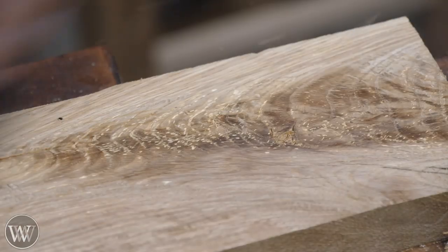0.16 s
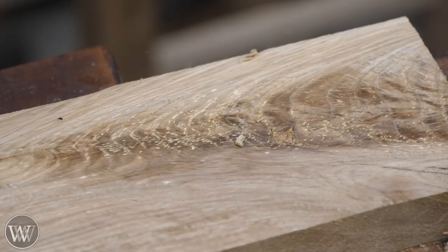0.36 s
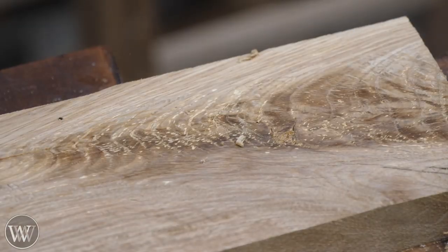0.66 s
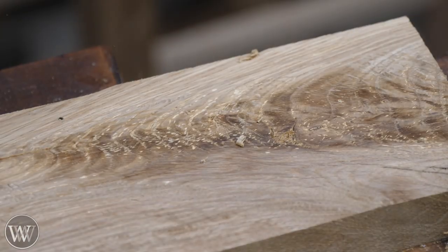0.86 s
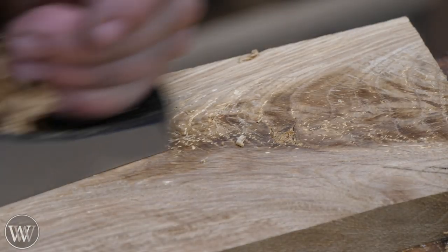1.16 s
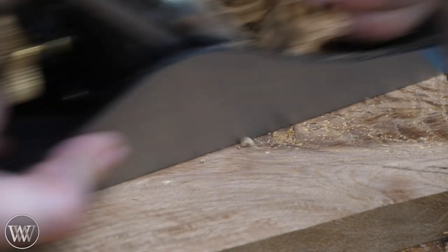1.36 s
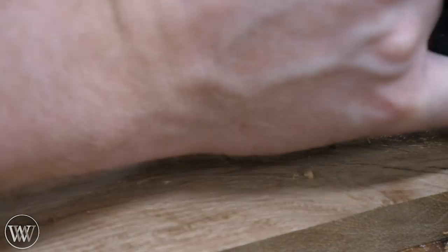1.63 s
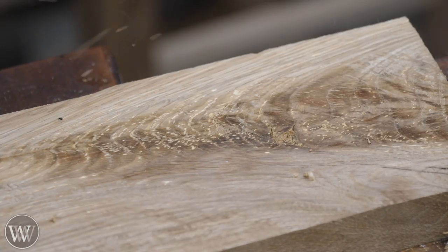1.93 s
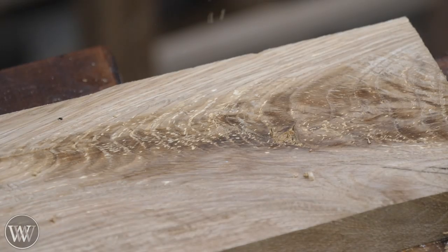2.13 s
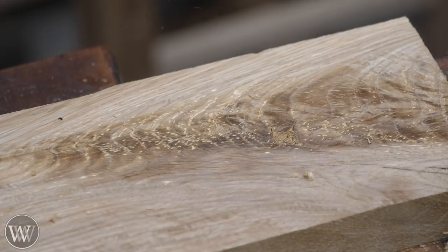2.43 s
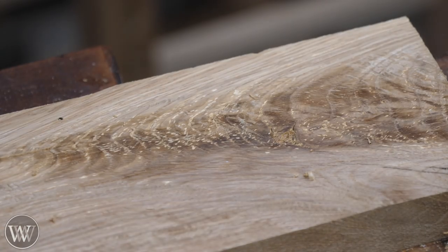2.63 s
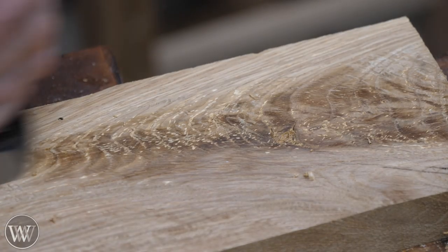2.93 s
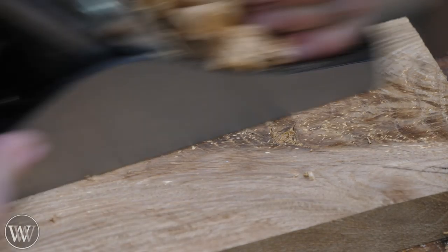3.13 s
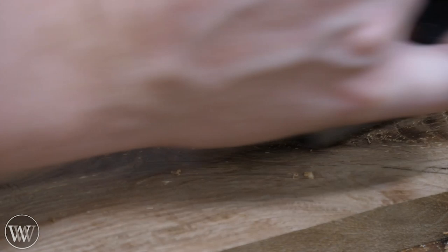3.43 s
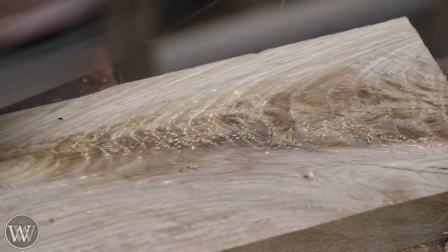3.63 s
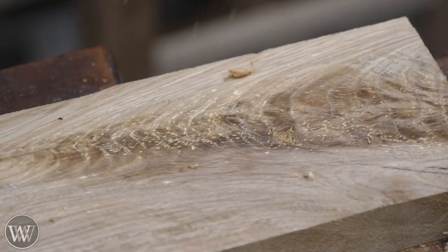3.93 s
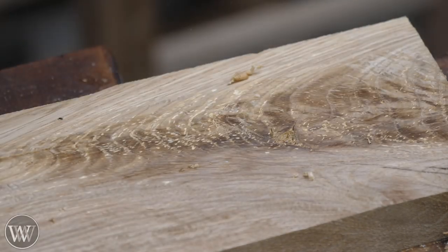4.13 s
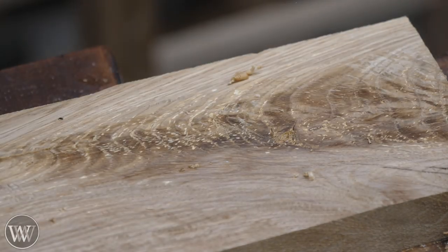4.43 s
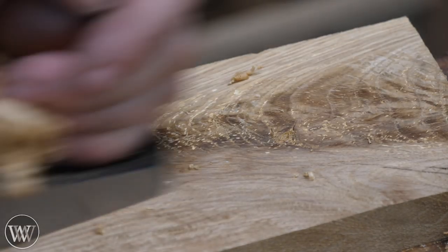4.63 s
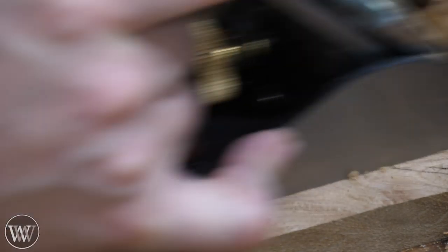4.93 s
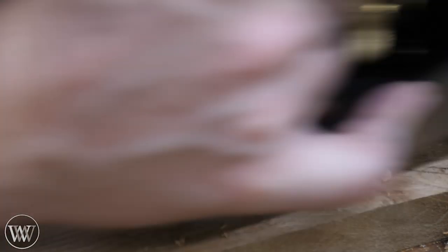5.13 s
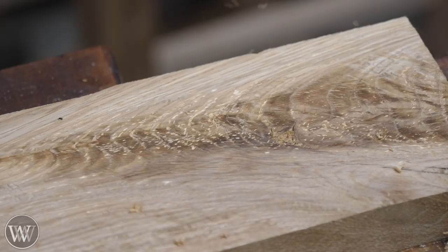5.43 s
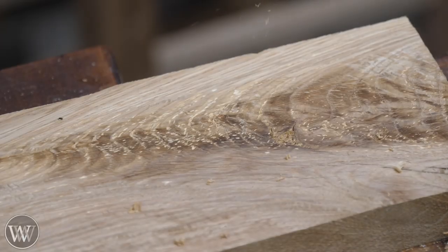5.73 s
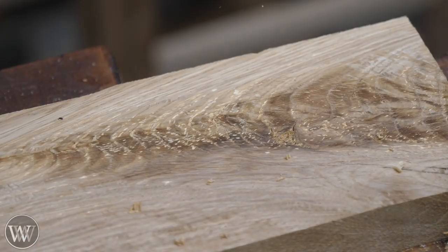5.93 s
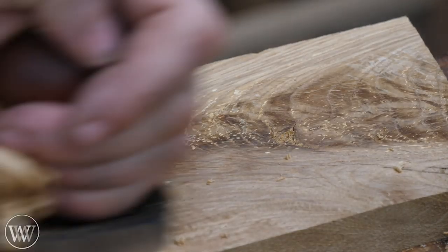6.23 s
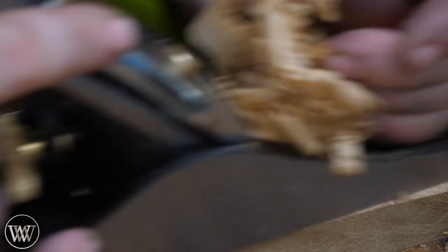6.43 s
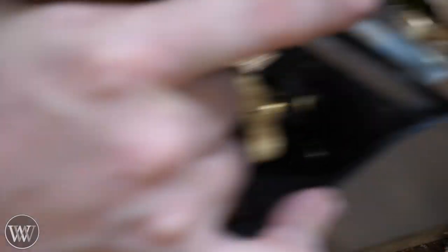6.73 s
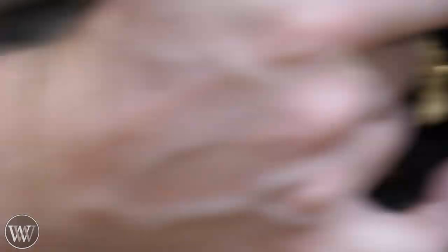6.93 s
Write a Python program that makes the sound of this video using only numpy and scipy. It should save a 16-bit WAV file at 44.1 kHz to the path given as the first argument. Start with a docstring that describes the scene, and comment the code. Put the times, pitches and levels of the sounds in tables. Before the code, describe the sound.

Four rasping plane strokes on hard wood, each opened by a loud wooden knock and separated by rumbling thumps, very close in a quiet workshop.

```python
"""In a small workshop, a hand plane takes four strokes along an oak board. The iron sole lands before each stroke
with a knock, a sum of decaying sines and noise; lighter knocks mark the last stroke. The blade tears fibres: dense
random snaps make a hiss that drives resonances of plane and board. Ahead of each landing, as the plane is carried,
low bumps and a rumble reach the single close microphone, which turns its gain down after loud peaks and clips."""
import sys
import numpy as np
from scipy import signal
from scipy.fft import rfft, irfft, next_fast_len
from scipy.io import wavfile
from scipy.ndimage import uniform_filter1d, map_coordinates

SR = 44100
rng = np.random.default_rng(int(sys.argv[2]) if len(sys.argv) > 2 else 0)


def store_pcm(level_fs):
    """Save levels as 16-bit WAV."""
    pcm = np.round(np.clip(level_fs, -1, 1) * 32767).astype(np.int16)
    wavfile.write(sys.argv[1], SR, np.atleast_2d(pcm).T)


N = 312228
STEP = 32  # samples between points of slow controls


def amp(db):
    """Decibels to an amplitude ratio."""
    return 10 ** (np.asarray(db) / 20)


def unit(x):
    """Normalisation to an rms of 1."""
    return x / np.sqrt(np.mean(x ** 2) + 1e-20)


def along(points, hz):
    """Interpolation of (Hz, value) points on a logarithmic frequency axis."""
    f, v = np.transpose(points)
    return np.interp(np.log(hz + 1), np.log(f + 1), v)


def curves(rows):
    """Linear interpolation in time: one value per sample for each column after the time."""
    s, *cols = np.transpose(rows)
    return [np.interp(np.arange(N) / SR, s, c) for c in cols]


def wobble(rate):
    """Slow random modulation: a smooth curve through rate random knots a second."""
    k = np.arange(0, N + STEP, STEP)
    knots = rng.standard_normal(int(N * rate / SR) + 4)
    return np.interp(np.arange(N), k, map_coordinates(knots, [k * rate / SR]))


def peaks(events, rise_db_per_s, fall_db_per_s):
    """Exponential growth and decay: summed gain of swells that climb to (s, dB) and sink again."""
    t = np.arange(0, N + STEP, STEP) / SR
    gain = 0
    for s, db, *_ in events:
        loss_db = np.where(t < s, rise_db_per_s * (s - t), fall_db_per_s * (t - s))
        gain = gain + amp(db - loss_db)
    return np.interp(np.arange(N) / SR, t, gain)


def filtered(x, response):
    """Linear filtering: the spectrum of x times a response of frequency."""
    m = next_fast_len(N + SR // 2)
    return irfft(rfft(x, m) * response(np.fft.rfftfreq(m, 1 / SR)), m)[..., :N]


def shaped(x, spectrum):
    """Spectral shaping of x by (Hz, dB) points."""
    return filtered(x, lambda f: amp(along(spectrum, f)))


def band(x, lo_hz, hi_hz):
    """Causal band-pass filtering."""
    sos = signal.butter(2, [lo_hz, min(hi_hz, .45 * SR)], "bandpass", fs=SR, output="sos")
    return signal.sosfilt(sos, x)


def resonance(f, centre_hz, width_hz, db):
    """Response of a damped resonator, with its peak at the centre frequency."""
    damping = 1j * f * width_hz
    return amp(db) * damping / (centre_hz * centre_hz - f * f + damping)


def swelling(x, table, depth_db, rate):
    """Modal excitation: each mode swells and fades on its own as the pressure on the iron shifts."""
    each = filtered(x, lambda f: np.array([resonance(f, *mode) for mode in table]))
    return sum(amp(depth_db * wobble(rate)) * y for y in each)


def snaps(spread_db, patchy_db):
    """Granular noise: dense snaps of unequal size, in patches of gain that drift in time and pitch."""
    grains = rng.standard_normal(N + 512) * amp(spread_db * rng.standard_normal(N + 512))
    z = signal.stft(grains, nperseg=512)[2]
    field = uniform_filter1d(rng.standard_normal(z.shape), 8, 0)
    field = uniform_filter1d(field, 10, 1)
    return signal.istft(z * amp(patchy_db * unit(field)), nperseg=512)[1][:N]


def noise(spectrum):
    """Random noise of rms 1 with a shaped spectrum."""
    return unit(shaped(rng.standard_normal(N), spectrum))


# spectrum of the room and microphone noise: pitch_hz, level_db (per Hz)
AIR_SPECTRUM = [(88, -2), (150, 4), (475, 4), (662, 0), (1760, -7.5), (3160, -14.5), (9630, -17),
                (14200, -14), (16000, -25)]
AIR_DB = -51.5


def room_air():
    """Background noise: shaped granular noise whose level drifts slowly."""
    return amp(AIR_DB + 3.6 * wobble(4.2)) * unit(shaped(snaps(spread_db=1.6, patchy_db=2.0), AIR_SPECTRUM))


# strokes, one row each: lift_off_s, slide_hiss_db (change while sliding), groan_db (over the ring)
STROKES = [(1.74, -13.5, -28), (3.479, -4.5, -17), (5.182, -11.5, -15), (6.96, -4.5, -13.5)]
# the blade in the wood, one list a stroke, from landing to the far edge: time_s, hiss_db, ring_db, scrape_db
CUTS = [
    [(0.6, -82, -64, -64), (0.66, -52, -52, -45), (0.745, -40, -41.5, -37), (0.925, -33, -35.5, -39.5),
     (0.98, -36, -42.5, -41), (1.05, -30.5, -40.5, -41), (1.11, -25, -30.5, -42), (1.21, -31, -33, -56),
     (1.32, -28.5, -34.5, -43), (1.4, -28.5, -35.5, -40), (1.49, -28, -35.5, -49), (1.56, -27, -35, -52)],
    [(2.38, -53, -48, -46), (2.44, -41.5, -59, -32), (2.505, -44, -33, -36.5), (2.525, -40, -29, -27),
     (2.556, -50, -37, -36), (2.625, -42, -55, -41), (2.643, -33, -34, -32), (2.81, -36, -33, -38.5),
     (2.93, -27, -38.5, -36.5), (3.01, -23.5, -35, -36), (3.1, -27.5, -27, -56), (3.16, -26, -34.5, -41),
     (3.335, -26, -32.5, -55)],
    [(4.12, -53, -52, -41), (4.19, -38.5, -49, -32.5), (4.228, -45, -38, -30), (4.256, -35, -38, -41.5),
     (4.29, -33.5, -36, -32), (4.335, -29.5, -28.5, -33.5), (4.428, -35, -34, -36.5),
     (4.46, -30, -39, -27.5), (4.575, -24.5, -30, -40.5), (4.72, -27.5, -36, -36.5), (4.8, -27, -32, -44),
     (4.88, -24.5, -28, -46), (4.93, -27, -30, -39), (5.015, -24, -32.5, -44)],
    [(5.75, -59, -48, -42), (5.82, -42, -35, -31), (5.87, -31, -28, -30), (5.93, -34.5, -25.5, -39.5),
     (6.07, -33, -38.5, -34.5), (6.12, -28.5, -32.5, -28.5), (6.142, -26.5, -25, -25.5),
     (6.17, -27, -31.5, -35), (6.27, -27, -38, -36), (6.325, -27.5, -28.5, -31), (6.43, -24, -33.5, -37.5),
     (6.57, -24.5, -28, -38), (6.63, -27, -33, -53), (6.81, -26.5, -32.5, -48)],
]
# leaving the wood; tipping the sole at lift-off; dying away
EXIT_S, LIFT_S, GONE_S = 0.01, 0.035, 0.26
# hiss: drop at the edge; further change by lift-off and just after it, each from the sliding level
EXIT_DROP_DB, LIFT_HISS_DB, GONE_HISS_DB = -7, -12, -21
# ring, from its last level in the cut: past the edge, before lift-off, tipping (it rings up), just after
EXIT_RING_DB, SLIDE_RING_DB, LIFT_RING_DB, GONE_RING_DB = -7, -15, -8.5, -26.5
SLIDE_SCRAPE_DB = -8  # scrape relative to the ring from the edge until it dies away


def travel():
    """Contact control: hiss, ring and scrape dB, share of cut done, groan offset dB; in the air, silent."""
    rows = []
    for cut, (lift, slide_db, groan_over) in zip(CUTS, STROKES):
        start, (end, hiss, ring, _) = cut[0][0], cut[-1]
        bare = hiss + EXIT_DROP_DB
        sliding = bare + slide_db
        gone = lift + LIFT_S + GONE_S
        rows += [(start - LIFT_S, -90, -90, -90, 0, groan_over)]
        rows += [(*row, (row[0] - start) / (end - start), groan_over) for row in cut]
        # past the edge the sole slides on bare
        after = [(end + EXIT_S, bare, ring + EXIT_RING_DB),
                 (lift - LIFT_S, sliding, ring + SLIDE_RING_DB),
                 (lift, sliding + LIFT_HISS_DB, ring + LIFT_RING_DB),
                 (lift + LIFT_S, sliding + GONE_HISS_DB, ring + GONE_RING_DB),
                 (gone, -90, ring - 40),
                 (gone + LIFT_S, -90, -90)]
        rows += [(s, h, r, r + SLIDE_SCRAPE_DB, 1, groan_over) for s, h, r in after]
    return curves(rows)


# the bench shudders: peak_s, level_db (of the rumble gain)
SHUDDERS = [(0, -43), (.22, -22), (.5, -51), (1.12, -41), (1.6, -34), (1.96, -34), (2.01, -27), (2.32, -52),
            (2.93, -39), (3.39, -30), (3.47, -42), (3.74, -20), (4.07, -27), (5.05, -38), (5.39, -17),
            (5.72, -29.5), (6.58, -42), (6.78, -43), (6.96, -39)]
RISE_DB_PER_S, FALL_DB_PER_S = 236, 173
# rumble spectrum: pitch_hz, level_db (per Hz)
RUMBLE_SPECTRUM = [(13, -7.5), (22, 4.5), (81, 1.5), (250, -21.5), (416, -30), (500, -24.5), (650, -50),
                   (1100, -120)]
REST_DB, PUSHED_DB = -66.5, -20.5  # rumble at rest; rumble relative to the hiss level
# spectrum of rustling cloth and shavings: pitch_hz, level_db (per Hz)
RUSTLE_SPECTRUM = [(200, -20), (600, 2), (2000, -6), (5000, -7.5), (11000, -11), (16000, -21)]
RUSTLE_DB, RUSTLE_GROWTH = -41, 0.58  # exponent: it swings less than the rumble


def shudders():
    """Structure-borne vibration: a lumpy low rumble, and a rustle that follows the shudders by a power law."""
    shudder = peaks(SHUDDERS, RISE_DB_PER_S, FALL_DB_PER_S)
    lumps_db = 6 * wobble(14)
    shake = amp(REST_DB) + amp(travel()[0] + PUSHED_DB + lumps_db) + shudder
    rumble = shake * amp(1.95 * wobble(25)) * noise(RUMBLE_SPECTRUM)
    rustle = unit(shaped(snaps(spread_db=2.5, patchy_db=2.5), RUSTLE_SPECTRUM))
    return rumble + shudder ** RUSTLE_GROWTH * amp(RUSTLE_DB + 4.7 * wobble(50)) * rustle


# pushes on the microphone: peak_s, level_db (before venting), width_ms (2/3 of the decay constant)
BUMPS = [(.1944, -11.5, 0.65), (0.2014, -7, 1.5), (0.2256, -3, 4.3), (0.267, -12, 3.4), (0.29, -9, 6),
         (1.9596, 4.5, 0.34), (2.0079, 1, 1.55), (3.703, -11, 1.4), (3.71, -6, 0.97), (3.7399, 0.5, 2.8),
         (3.771, -8.5, 2.4), (3.803, -12, 5), (5.3627, -6, 2.8), (5.3676, 0, 0.5), (5.3755, -7.5, 0.9),
         (5.4149, -6.5, 0.99), (5.441, -15.5, 0.9)]


def bumps():
    """Pressure transients: one-sided pointed pushes on the capsule, high-passed by its vent."""
    push, t = np.zeros(N), np.arange(-SR // 20, SR // 20) / SR
    for s, db, ms in BUMPS:
        point = np.exp(-np.abs(t * 1000 / (1.5 * ms)) ** 1.07)
        push[round(s * SR) - SR // 20:][:len(t)] += amp(db) * np.hanning(len(t)) * point
    return filtered(push, lambda f: f ** 4 / (f ** 4 + 45 ** 4))  # slow pressure escapes


# small ticks near the microphone: start_s, level_db, treble_db (gain of the treble band)
TICKS = [(0.195, -22, -10), (0.21, -29, 14), (0.227, -16, -10), (0.265, -31, -23), (1.735, -25, -12),
         (1.958, -16.5, -2), (2.004, -18.5, -25.5), (3.709, -14.5, -5), (3.737, -4.5, -7),
         (5.366, -12, -20), (5.378, -22, 6), (5.417, -8, -16)]


def ticks():
    """Impulsive noise: dry bursts that decay in milliseconds, in a middle and a treble band."""
    out, t = np.zeros(N), np.arange(-SR // 20, SR // 20) / SR
    for s, db, treble_db in TICKS:
        burst = amp(-60 * np.abs(t) / 0.0056) * (t >= .001) * rng.standard_normal(len(t))
        tick = 1.87 * band(burst, 270, 2820) + amp(treble_db) * band(burst, 1800, 8000)
        out[round(s * SR) - SR // 20:][:len(t)] += amp(db) * tick
    return out


# the sole lands and bounces: start_s, level_db, then relative to it
# iron_db, thud_db, thud_hz, low_tail_db, bright_tail_db
KNOCKS = [(0.5033, -3.5, 0.5, -30, 242, -24.5, -19.5), (0.507, -12, 5, -30, 256, -26, -32),
          (2.2912, -4.5, -14, -11, 226, -15, -19.5), (2.312, -17.5, 12, -16, 230, -7.5, -10.5),
          (3.9559, -5, -10, -18, 206, -12, -16), (4.052, -6, 7, -7, 205, -13.5, -13.5),
          (5.6554, -2, -4.5, -16, 266, -16.5, -17), (5.6952, -5.5, 1, -3.5, 196, -14.5, -18),
          (6.126, -41, -7.5, -23, 457, -12, -13), (6.812, -36, -27, 22, 340, 6, -15),
          (6.958, -26.5, -24, 11.5, 244, -11.5, -11)]
# struck wood modes: pitch_hz, level_db, t60_s
STRUCK_WOOD = [(467, -8, 0.013), (623, -5, 0.011), (602, 23, 0.0027), (840, 2.5, 0.0088),
               (1060, -2.5, 0.0082)]
# struck iron modes: pitch_hz, level_db, t60_s
STRUCK_IRON = [(1816, 3.5, 0.011), (1988, -3.5, 0.026), (2160, -44, 1), (2280, -1.5, 0.011),
               (2480, -27, 0.04), (2730, -13, 0.016), (3020, -10, 0.01), (3260, -15, 0.018),
               (4900, -43, 0.0049)]
# spectrum of the rattle after a knock: pitch_hz, level_db (per Hz)
RATTLE_SPECTRUM = [(29, -44), (50, -4), (264, 2), (462, 1), (778, 5.5), (1510, -11.5), (1990, -10.5),
                   (2750, -17), (3300, -24.5), (6000, -30), (7800, -53), (13200, -120)]


def decaying_sine(t, hz, db, t60):
    """Free vibration of one damped mode, which falls 60 dB in t60 seconds."""
    return amp(db - 60 * t / t60) * np.sin(2 * np.pi * hz * t)


def struck(table, t):
    """Modal superposition: damped modes excited at slightly new strengths by each blow."""
    return sum(decaying_sine(t, hz, db + rng.normal(0, 1.5), t60) for hz, db, t60 in table)


def knocks():
    """Impact excitation: each landing rings wood and iron, thuds the bench and leaves a rattling tail."""
    out, tail, t = np.zeros(N + SR), np.zeros((2, N + SR)), np.arange(SR // 2) / SR
    onset = 1 - np.exp(-(t / 0.00065) ** 2)  # the contact lasts a fraction of a millisecond
    for s, db, iron_db, thud_db, thud_hz, low_db, bright_db in KNOCKS:
        start = round(s * SR)
        burst = 0.31 * amp(-60 * t / 0.0098) * rng.standard_normal(len(t))
        crack = band(band(burst, 1070, 6900), 600, 9500)
        iron = amp(iron_db) * (struck(STRUCK_IRON, t) + crack)
        thud = decaying_sine(t, thud_hz, thud_db, 0.043)
        bench = decaying_sine(t, 62, -33.5, 1.33) + decaying_sine(t, 146, -32.5, 1.2)
        out[start:][:len(t)] += amp(db) * onset * (struck(STRUCK_WOOD, t) + iron + thud + bench)
        tail_db = db + np.array([[low_db], [bright_db]])
        tail[:, start:][:, :len(t)] += amp(tail_db - 60 * t / 0.45) * (1 - np.exp(-t / 0.002))
    rattle = noise(RATTLE_SPECTRUM)  # it keeps the modes of board and sole sounding
    low = unit(band(rattle, 130, 830) + 0.41 * swelling(rattle, BOARD_MODES, 0.75, 10))
    bright = unit(band(rattle, 520, 7000) + 0.7 * swelling(rattle, SOLE_MODES + SCRAPE_MODES, 4, 12))
    return out[:N] + tail[0, :N] * low + tail[1, :N] * bright


# the edge catches in wild grain: peak_s, level_db, pitch_hz (centre of the favoured board modes)
CATCHES = [(1.214, -28.5, 314), (1.534, -33, 268), (1.736, -34.5, 302), (2.95, -30.5, 278),
           (3.095, -27, 286), (3.334, -27.5, 265), (3.48, -33.5, 260), (4.58, -30.5, 346), (4.8, -24, 280),
           (4.88, -42, 305), (5.01, -34.5, 343), (5.82, -34, 245), (6.245, -40, 456), (6.33, -51, 400),
           (6.575, -39, 330), (6.645, -60, 350)]
CATCH_DB_PER_S, GROAN_START_HZ = 257, 403  # a catch swells and fades; pitch at the near end of the board
GROAN_GROWS_DB = 11.5  # from the start to the end of a cut
# board modes: centre_hz, width_hz, level_db
BOARD_MODES = [(163, 14, 9), (204, 10.6, 14), (268, 34, 3.5), (353, 120, 1), (456, 154, 9.5)]


def board_groan(rub, grain, done, base_db):
    """Position-dependent coupling: the place of the plane along the board picks the modes that it drives."""
    gain = amp(base_db + GROAN_GROWS_DB * done) + peaks(CATCHES, CATCH_DB_PER_S, CATCH_DB_PER_S)
    landings = [(cut[0][0], GROAN_START_HZ) for cut in CUTS]
    groan_hz, = curves(sorted(landings + [(s, hz) for s, db, hz in CATCHES]))
    groan = 0
    for mode in BOARD_MODES:
        nearness = np.exp(-(np.log(groan_hz / mode[0]) / .25) ** 2) + .15
        groan = groan + nearness * filtered(rub, lambda f: resonance(f, *mode))
    return gain * amp(0.84 * grain + 3.2 * wobble(40)) * unit(groan)


# sole modes: centre_hz, width_hz, level_db
SOLE_MODES = [(730, 70, -7), (875, 60, 0), (960, 60, -2), (1160, 70, -6)]


def sole_ring(rub, grain):
    """Forced vibration: rubbing noise drives the modes of the sole."""
    return unit(swelling(rub, SOLE_MODES, 2.5, 8)) * amp(1.1 * grain + 1.8 * wobble(60))


# scrape modes: centre_hz, width_hz, level_db
SCRAPE_MODES = [(1292, 880, 15), (1470, 120, 5.5), (1910, 190, 12.5), (2330, 530, -32), (2780, 660, 8.5),
                (3420, 100, 13)]


def scraping(rub, grain):
    """Frictional excitation: the same rubbing noise drives a higher set of resonances."""
    return unit(swelling(rub, SCRAPE_MODES, 3, 10)) * amp(1.1 * grain + 1.2 * wobble(70))


# spectrum of the tearing fibres: pitch_hz, level_db (per Hz)
HISS_SPECTRUM = [(1290, -53), (2200, -65), (2470, -12), (4720, 2.5), (5570, -1.5), (6750, 1), (14600, 2),
                 (16000, -7)]
# iron modes of the blade: centre_hz, width_hz, level_db (over the hiss)
BLADE_MODES = [(5150, 280, -7), (5860, 67, 0), (6620, 105, 0.5), (7850, 250, -5.5), (8830, 98, -7),
               (10700, 120, -13), (11900, 130, -26)]
# from the start to the end of a cut: treble is raised, and the rest lowered, by this much
TILT_START_DB, TILT_END_DB = 1.5, -3.5


def tearing_hiss(grain, done):
    """Stochastic fracture: dense fibre snaps excite the blade, and the spectral tilt shifts along the cut."""
    tilt_db = TILT_START_DB + (TILT_END_DB - TILT_START_DB) * done
    plain = shaped(snaps(spread_db=1.2, patchy_db=2.4), HISS_SPECTRUM)
    torn = unit(plain + swelling(plain, BLADE_MODES, 3.5, 7))
    high = filtered(torn, lambda f: 1 / (1 + (7000 / (f + 1)) ** 4))
    hiss = amp(-tilt_db) * (torn - high) + amp(tilt_db) * high
    return hiss * amp(1.1 * grain + 1.1 * wobble(70) + .6 * wobble(160))


def strokes():
    """Common modulation: growth rings in the wood sway the hiss, ring, scrape and groan together."""
    hiss_db, ring_db, scrape_db, done, groan_over = travel()
    grain = wobble(30)  # hard and soft growth rings pass under the edge
    rub = snaps(spread_db=1.5, patchy_db=2.2)
    out = amp(hiss_db) * tearing_hiss(grain, done)
    out += amp(ring_db) * sole_ring(rub, grain)
    out += amp(scrape_db) * scraping(rub, grain)
    return out + board_groan(rub, grain, done, ring_db + groan_over)


# level of the side signal relative to its scattered source: pitch_hz, side_db
SIDE_SPECTRUM = [(60, -15), (110, -26), (200, -21.5), (380, -23.5), (700, -24), (1290, -26), (2380, -24.5),
                 (4400, -20), (8120, -17.5), (15000, -17)]


def scene():
    """Mid-side superposition: all sources in the middle, with a faint, flickering phase-scattered side."""
    steady = strokes() + room_air()
    blows = knocks() + bumps() + ticks() + shudders()
    z = signal.stft(steady + amp(-19.5) * blows, nperseg=256)[2]
    random_phase = np.exp(2j * np.pi * rng.random(z.shape))
    scattered = signal.istft(z * random_phase, nperseg=256)[1][:N]
    side = amp(1.44 * wobble(14)) * shaped(scattered, SIDE_SPECTRUM)
    mid = steady + blows
    return np.array([mid + side, mid - side])


TOP_HZ = 15900  # band limit


def record(dry):
    """Gain reduction and saturation: loud peaks lower the gain, which creeps back; then the input clips."""
    heard = filtered(dry.mean(0), lambda f: f > 300)
    over_db = np.maximum(20 * np.log10(np.abs(heard) + 1e-9) + 10, 0)
    fade = np.exp(-np.arange(SR // 2) / (.06 * SR))
    duck_db = np.minimum(signal.fftconvolve(over_db, fade)[:N] * 0.1, 6)
    late_duck_db = np.pad(duck_db, (400, 0))[:N]  # the control reacts after a delay of 400 samples
    turned = dry * amp(-late_duck_db)
    clipped = turned / (1 + np.abs(turned / .56) ** 12) ** (1 / 12)
    return filtered(clipped, lambda f: f < TOP_HZ)


dry = scene()
out = record(dry)
store_pcm(out)
```